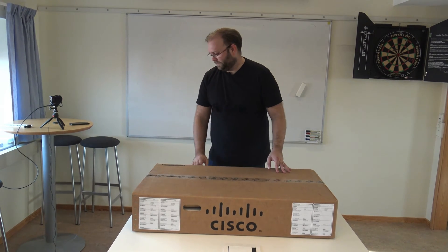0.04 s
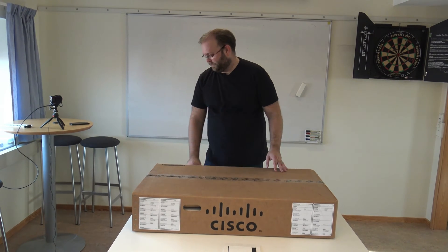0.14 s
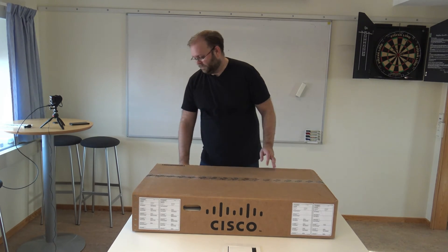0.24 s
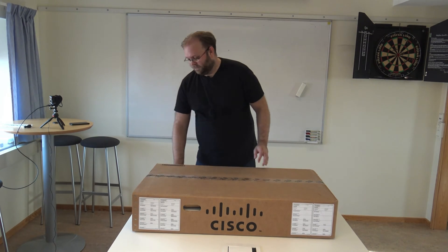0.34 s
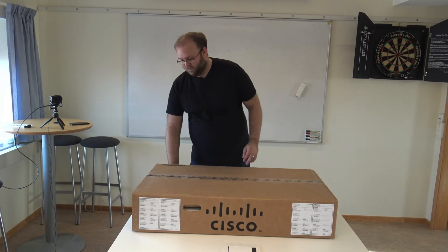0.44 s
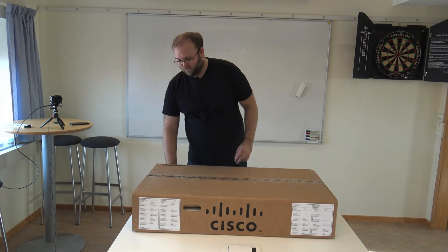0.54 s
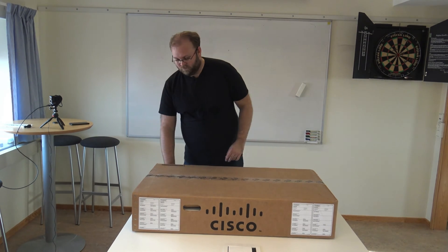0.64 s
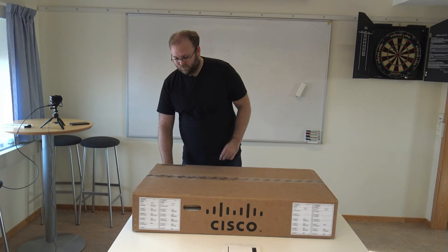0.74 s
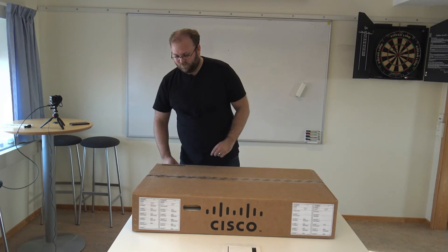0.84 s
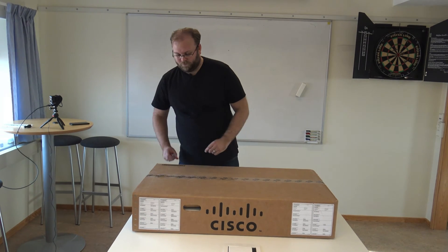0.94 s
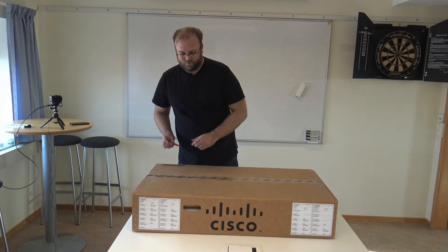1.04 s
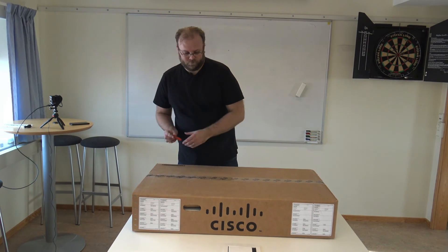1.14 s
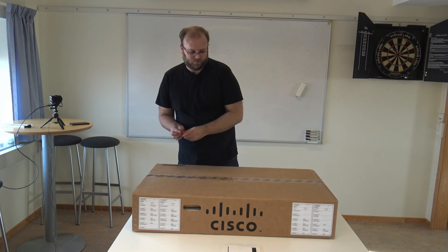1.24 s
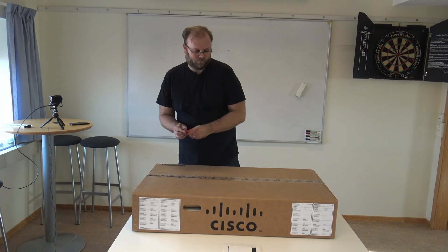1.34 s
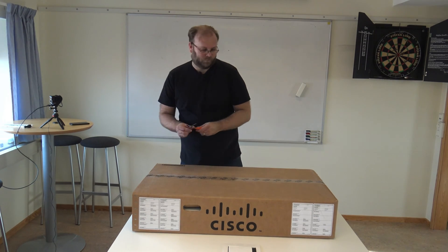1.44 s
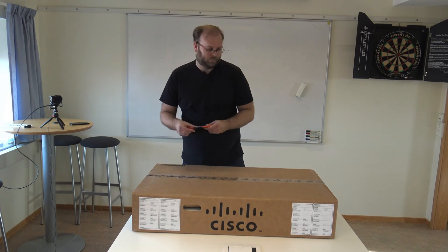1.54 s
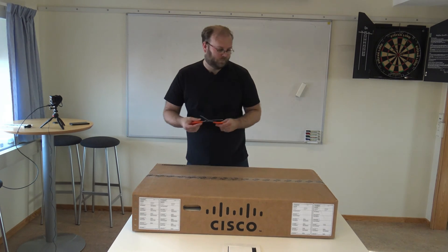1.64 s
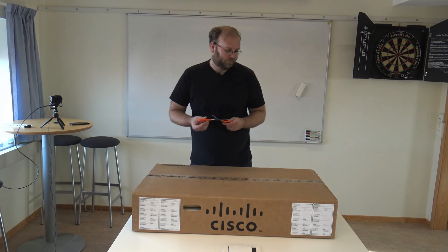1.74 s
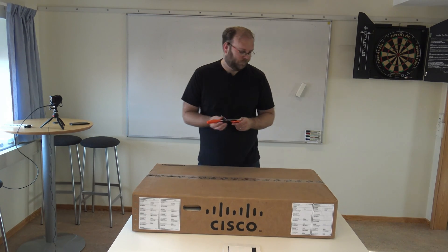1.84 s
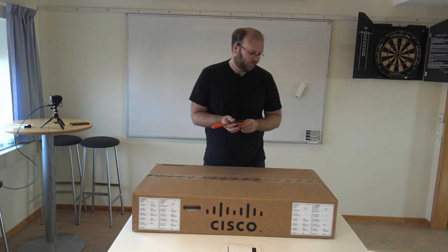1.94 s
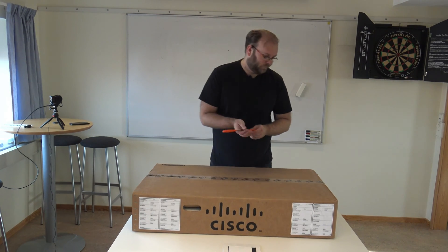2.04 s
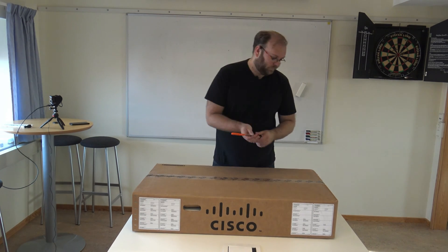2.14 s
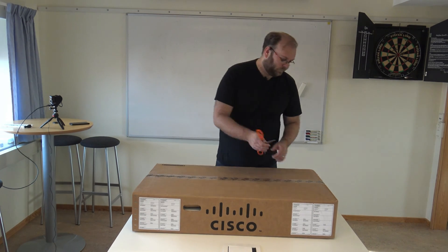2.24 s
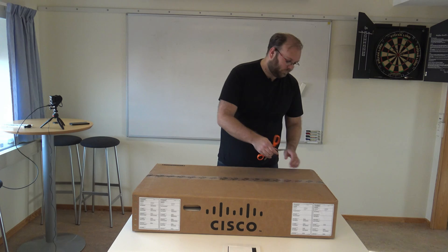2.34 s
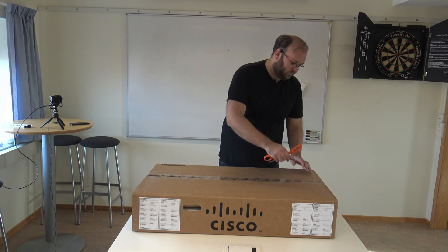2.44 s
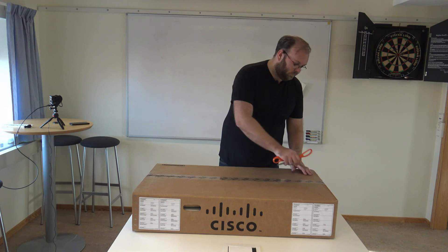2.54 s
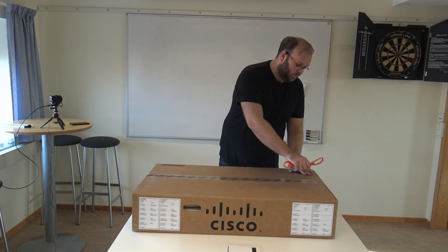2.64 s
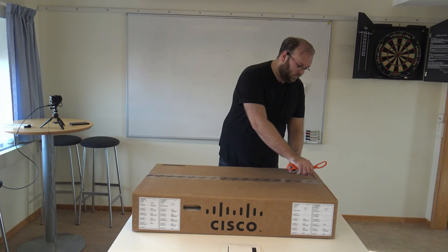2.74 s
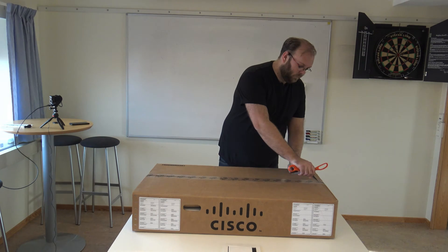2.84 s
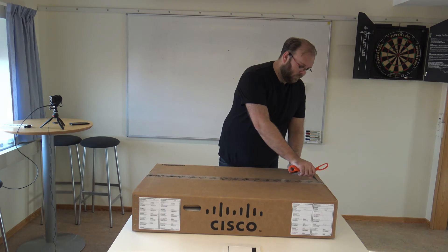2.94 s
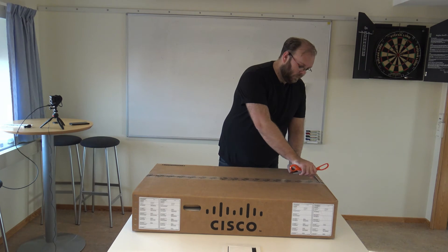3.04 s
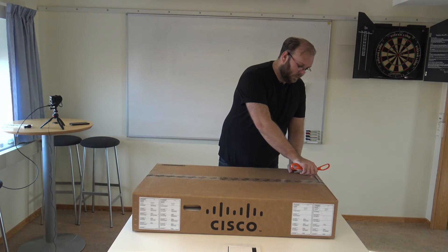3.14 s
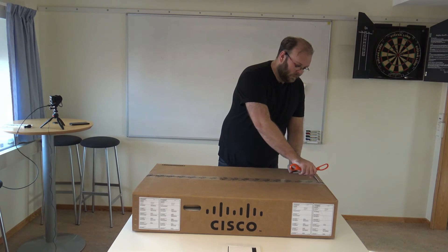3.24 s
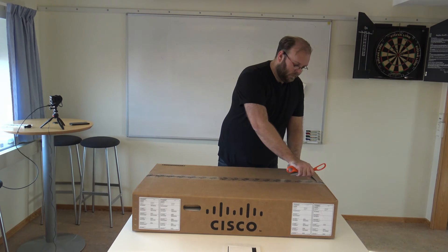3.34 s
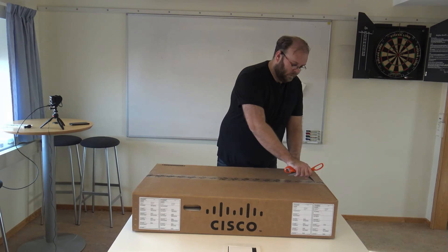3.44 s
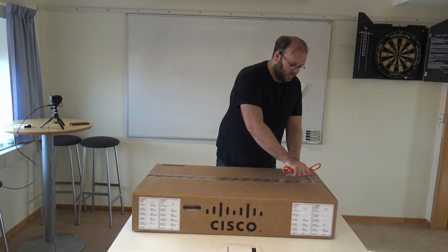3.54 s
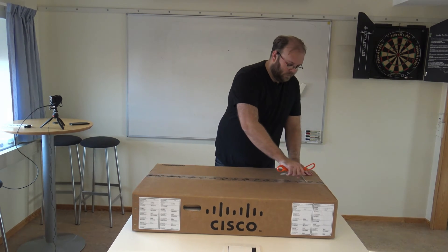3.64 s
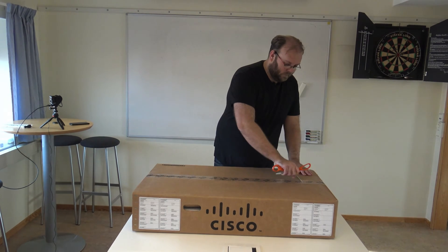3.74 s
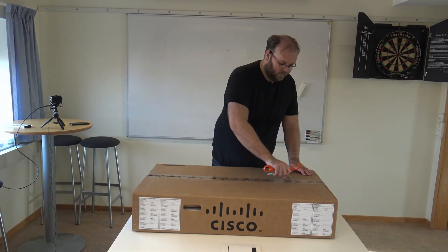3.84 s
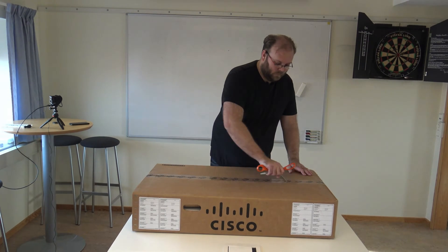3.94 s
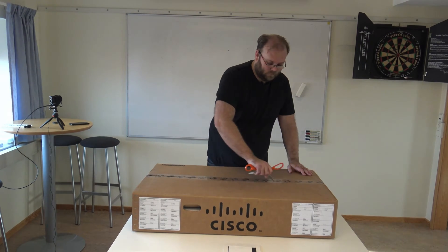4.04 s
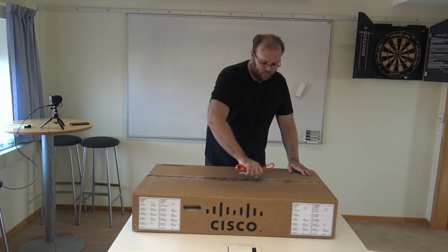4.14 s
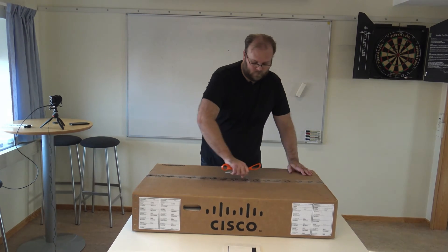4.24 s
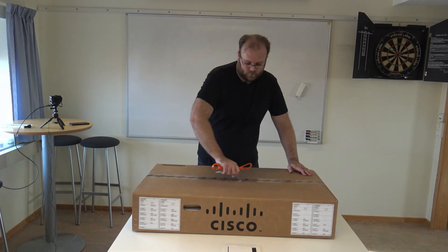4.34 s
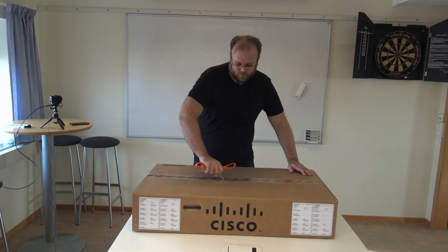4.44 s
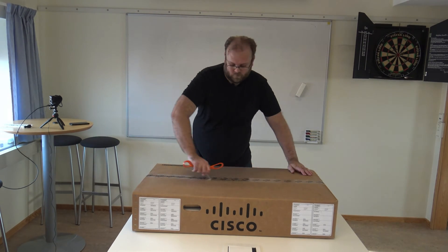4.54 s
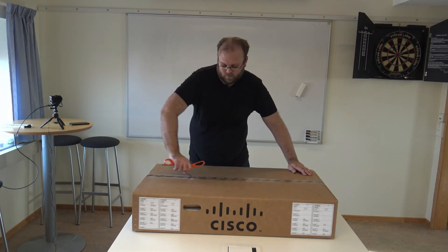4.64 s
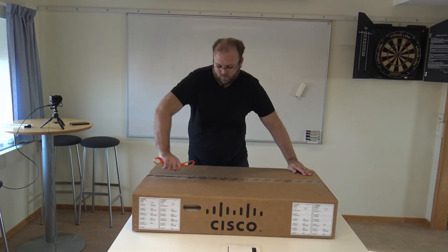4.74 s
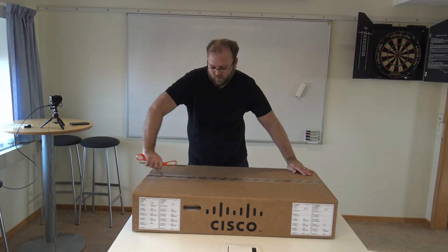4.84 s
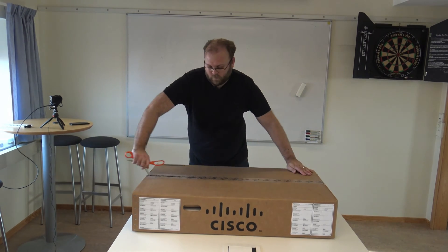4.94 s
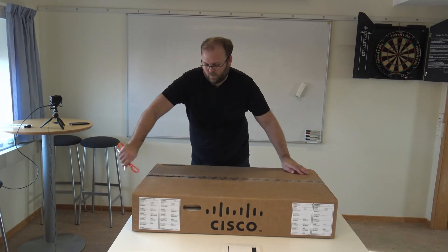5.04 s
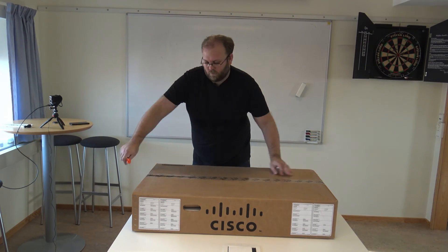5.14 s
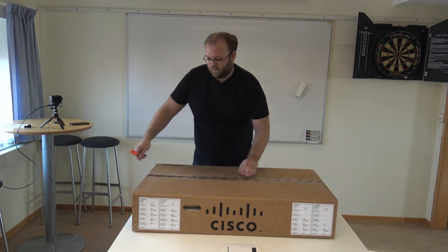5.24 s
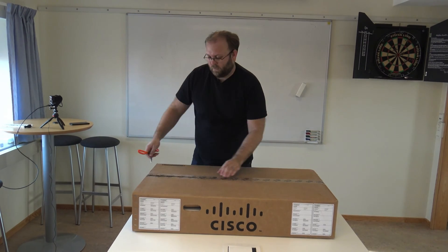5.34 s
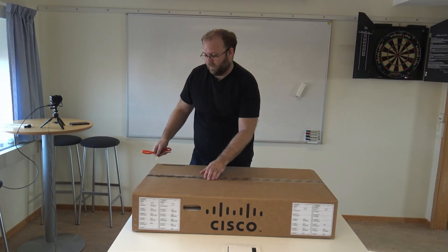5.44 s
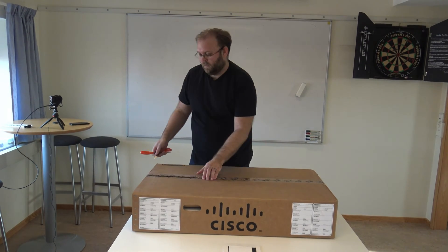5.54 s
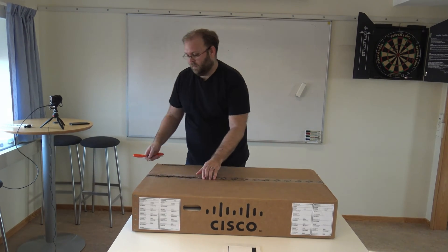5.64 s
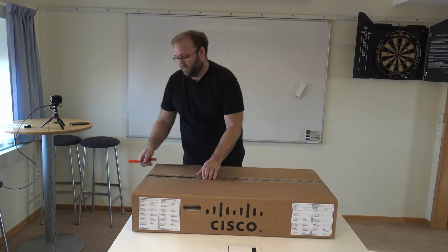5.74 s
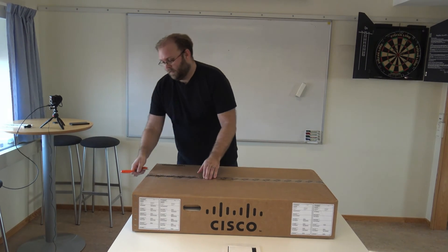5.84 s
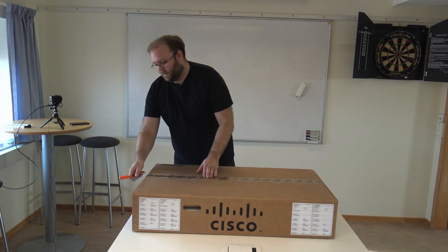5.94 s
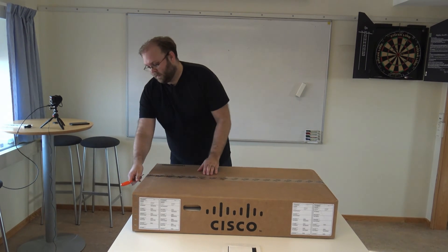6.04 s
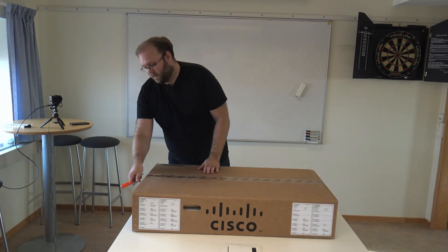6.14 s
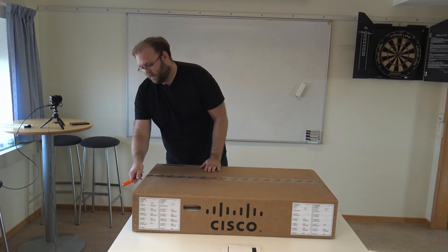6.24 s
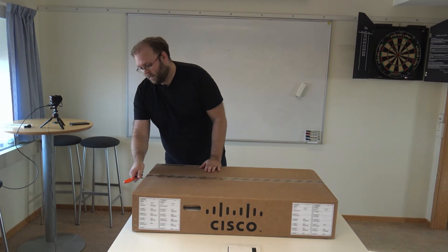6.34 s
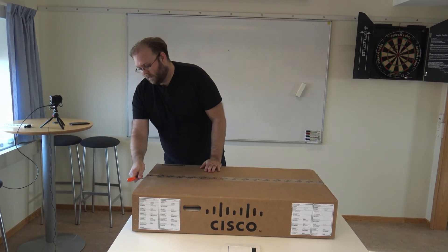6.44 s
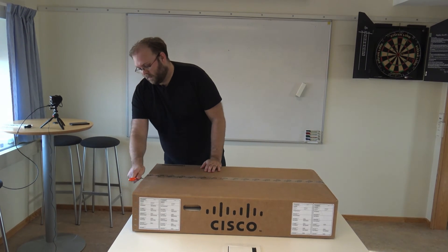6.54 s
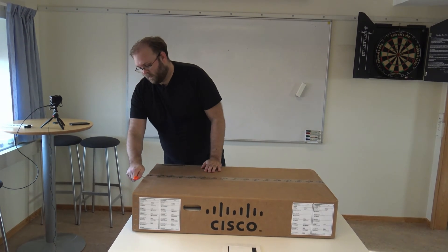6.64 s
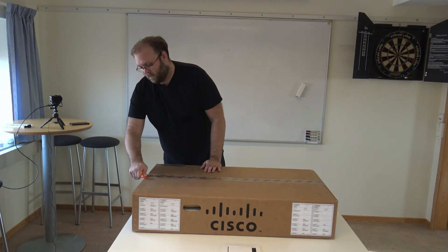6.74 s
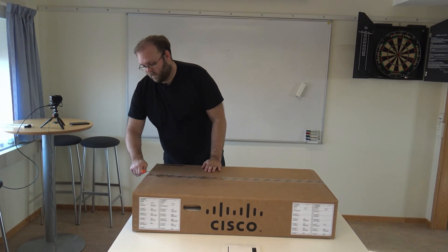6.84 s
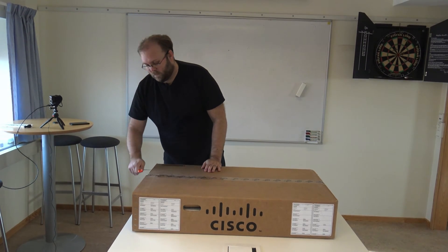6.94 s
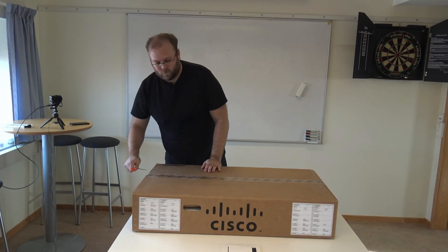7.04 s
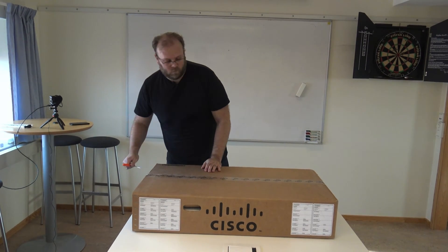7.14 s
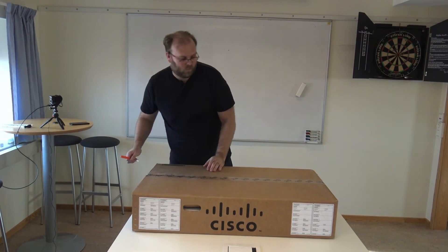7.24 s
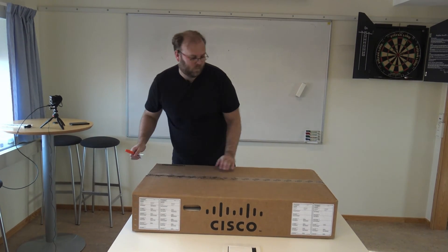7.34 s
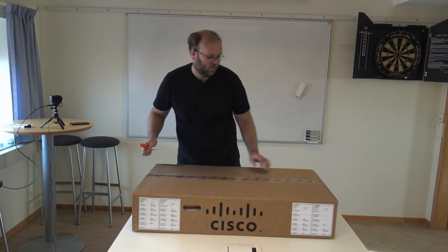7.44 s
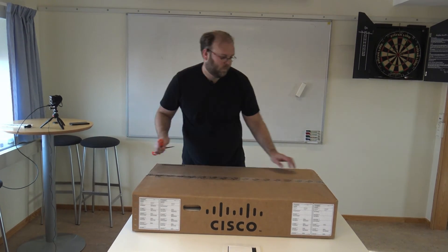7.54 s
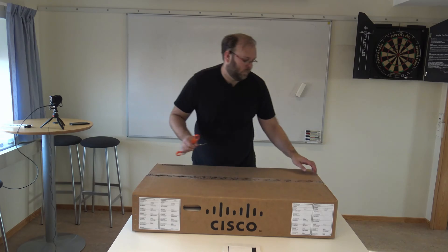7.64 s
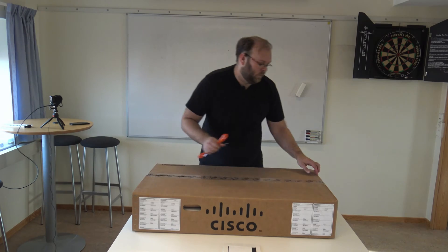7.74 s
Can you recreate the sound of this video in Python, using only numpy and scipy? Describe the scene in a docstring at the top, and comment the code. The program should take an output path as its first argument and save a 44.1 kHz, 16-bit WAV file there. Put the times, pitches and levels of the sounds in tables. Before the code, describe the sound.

In a small bare room, scissors clatter and click open with a ring, then a blade cracks and rasps through tape on a large hollow cardboard box.

```python
"""Ventilation murmurs in a small bare room and clothes rustle; scissors knock, slide, click open and ring.
The point taps a large cardboard box and bursts its packing tape with sharp cracks; then the blade drags
through a long cut: its jerks drum and rasp the board while the film crackles. Hands knock on the lid, and a
short second cut rips the tape at the end of the box. Noise bursts and stick-slip impulses excite filtered
bodies and decaying resonances; wall reflections are added, and both channels carry the same signal."""
import sys
import numpy as np
from scipy import signal
from scipy.fft import rfft, irfft
from scipy.io import wavfile

SR = 44100
rng = np.random.default_rng(int(sys.argv[2]) if len(sys.argv) > 2 else 0)


def generate_wav(sig):
    """Save sig (samples, or channels by samples) to the path in sys.argv[1] as 16-bit PCM at SR."""
    pcm = np.round(np.clip(np.atleast_2d(sig).T, -1, 1) * 32767).astype(np.int16)
    wavfile.write(sys.argv[1], SR, pcm)


N = 342657
T = np.arange(N) / SR  # scene time, s
RING_T = T[:SR * 3 // 4]  # time within one response, s

# ventilation spectrum: (frequency [Hz], level [dB])
AIR_SPECTRUM = [(20, -13), (40, 0.5), (75, -13.5), (150, -8.5), (220, -15), (560, -24), (800, -26.5),
                (1070, -23.5), (1600, -36), (3000, -35.5), (7000, -39.5), (15000, -45.5)]
AIR_DB, HEAVE_DB = -55, -43.5  # murmur; slow heave of the air near the table
# extra heave while he leans on the box: (time [s], length [s], level [dB])
LEANS = [(3.24, 0.75, -35)]
# clothes rustle as he moves: (time [s], length [s], level [dB])
RUSTLES = [(-.1, 0.49, -56.5), (.85, 0.62, -56.5), (1.5, 0.67, -65.5), (2.85, 0.59, -52),
           (5.1, 0.65, -55.5), (6.4, 0.76, -57.5), (7.35, 0.53, -54)]
# cloth spectrum: (frequency [Hz], level [dB])
CLOTH_SPECTRUM = [(400, 18), (1100, 8), (2000, 5.5), (3100, 5), (5000, 0), (7300, -1), (9000, -10),
                  (13000, -10.5), (15500, -75)]
# hands brush over cloth and tape: (time [s], length [s], level [dB])
SWISHES = [(0.94, 0.34, -70.5), (5.98, 0.065, -60), (6.05, 0.21, -59), (6.31, 0.073, -70),
           (6.39, 0.06, -65), (7.225, 0.024, -46.5)]
# fine hiss spectrum: (frequency [Hz], level [dB])
HISS_SPECTRUM = [(3000, -14), (7500, 8), (9500, 6), (12000, 7), (14000, -2), (15500, -25)]
# light scuffs of the blade at the end of the box and as it is drawn back: (time [s], length [s], level [dB])
SCUFFS = [(5.0, 0.11, -48), (5.99, 0.15, -55.5), (6.16, 0.13, -53), (6.31, 0.017, -50.5),
          (6.39, 0.057, -57.5)]
# blade on tape, spectrum: (frequency [Hz], level [dB])
TAPE_SPECTRUM = [(350, 11), (800, 5.5), (1200, 1.5), (1800, 0.5), (3000, 0), (5000, -1.5), (7500, -6.5),
                 (9500, -8.5), (12000, -12), (15500, -32)]
# the drawn-back blade scrapes the board: (time [s], pitch [Hz], level [dB])
BACK_SCRAPE_PATH = [(5.98, 1510, -66), (6.02, 1710, -59), (6.12, 2300, -61), (6.2, 1900, -60),
                    (6.29, 1800, -58), (6.33, 2420, -73), (6.37, 2000, -64), (6.44, 1700, -54),
                    (6.49, 1600, -68)]
# the drawn-back blade whispers on the film: (time [s], pitch [Hz], level [dB])
BACK_WHISPER_PATH = [(6.14, 7000, -66), (6.21, 7300, -62), (6.29, 6950, -63), (6.35, 7350, -63),
                     (6.39, 7260, -60), (6.45, 7400, -59), (6.49, 7400, -76)]
# his palm rubs the lid as it settles: (time [s], pitch [Hz], level [dB])
PALM_PATH = [(5.54, 1590, -62), (5.595, 1730, -55), (5.66, 1650, -70)]

# scissors knock on a hard surface behind the box:
# (time [s], level [dB], rattle pitch [Hz], steel tick against the knock [dB])
CLATTER_HITS = [(0.3827, -7, 2220, -12.5), (0.393, -12, 2000, -25), (0.4429, -6.5, 1120, -15.5),
                (0.4551, -22, 1240, -1), (0.4676, -13.5, 1620, -25), (0.482, -21, 1630, -16),
                (0.643, -17, 1060, -17), (0.677, -30, 1140, -22)]
BOUNCE_S, BOUNCE_DB = 0.0099, -5  # mean time to the second knock; its change of level
# hard surface spectrum: (frequency [Hz], level [dB])
SURFACE_SPECTRUM = [(88, -49), (150, -8), (364, -8), (486, 0.5), (714, -8), (1200, -4.5), (1400, -23),
                    (1670, 0), (3150, -14), (4720, -14.5), (8580, -35), (11700, -50), (15000, -48)]
# hard surface resonances: (frequency [Hz], level [dB], t60 [s])
SURFACE_RING = [(467, -2, 0.13), (1164, -2.5, 0.083), (1594, 1, 0.13), (1980, -14, .06),
                (2620, -0.5, 0.057)]
# scissors slide over that surface: (time [s], length [s], level at onset [dB])
SLIDE_STROKES = [(0.383, 0.017, -36), (0.441, 0.17, -35.5), (0.645, 0.09, -45.5)]
GRIT_DB = -20  # grit against the scrape
# shut blades ring as they slide: (frequency [Hz], level [dB], t60 [s])
SLIDING_BLADES = [(3620, -1, .03), (4780, 0, .045), (6250, 1, .06), (7150, -2, .06), (7800, -3, .045),
                  (11600, -9, .05), (13000, -13, .05)]
WAVER, WAVER_PER_S = .012, 45  # pitch share per unit of wander; wander values a second
# the surface squeaks under sliding steel: (time [s], pitch [Hz], level [dB])
SQUEAK_PATH = [(0.385, 2180, -51), (0.42, 2150, -37), (0.44, 1930, -57), (0.48, 1650, -56),
               (0.52, 1660, -40), (0.58, 1480, -76), (0.67, 1180, -44.5), (0.82, 1110, -57)]
OVERTONE, OVERTONE_DB = 1.43, -7  # second resonance of every croak or squeak: pitch ratio, level

# clicks of the scissors:
# (time [s], level [dB], contact pitch [Hz], joint against contact [dB], top of the click [Hz])
CLICKS = [(0.895, -33, 3170, -20, 5000), (1.342, -24, 2180, -20, 9000), (1.376, -25.5, 2070, -16, 11000),
          (1.389, -26, 2580, -12, 10000), (1.400, -23.5, 2410, -5, 12000), (1.507, -30, 2120, -15, 4000),
          (1.566, -23, 2330, -25, 5560), (1.648, -27.5, 2140, -2, 13000), (1.701, -31, 2100, -25, 3000),
          (1.7148, -22, 2600, 3, 14000), (1.7616, -14.5, 2870, -6, 7400), (1.8491, -27.5, 2950, -18, 4500),
          (1.8735, -33, 3830, 9, 10000), (1.9283, -18.5, 2900, -1, 8450), (1.95, -21.5, 2820, 6, 11000),
          (2.098, -18, 2930, -19, 7000), (2.112, -19, 1430, -11, 13000), (2.125, -28, 3640, 10, 13000),
          (2.2322, -5, 2630, 6, 13000), (2.2465, -14, 3700, 10, 13000), (2.5188, -29.5, 1510, -15, 9000),
          (7.208, -26.5, 1445, -16, 9000), (7.22, -21.5, 2040, -5, 12000), (7.233, -19.5, 1650, -8, 12100)]
CONTACT_OVERTONE = 2.3  # second contact resonance, as a pitch ratio
# steel blade resonances: (frequency [Hz], level [dB], t60 [s])
BLADE_RING = [(1405, -8, .18), (2530, 1, .1), (2585, -4, .4), (2930, -5, .12), (3682, -1, .28),
              (3950, -6, .3), (5426, -4, .42), (6170, -6, .2), (6500, 0, .17), (6810, 0, .15),
              (7210, -6, .36), (7290, -7, .13), (7900, -4, .16), (9900, -7, .15), (10400, -7, .14),
              (11120, -11, .2), (11280, -10, .2), (12270, -13, .18), (12990, -11, .18)]
RING_DB_PER_DB = 0.75  # blade ring follows the click level at this rate, dB per dB
# dry click of the joint, spectrum: (frequency [Hz], level [dB])
JOINT_SPECTRUM = [(700, -51), (1500, -18), (2600, -17), (4500, -36), (5600, -11), (7200, 11.5),
                  (8800, -4.5), (10600, 4), (12700, 3), (15500, 0)]
# steel on steel, spectrum: (frequency [Hz], level [dB])
STEEL_SPECTRUM = [(900, -60), (1450, -3), (1900, -2.5), (2300, 3.5), (2900, -3.5), (4200, 0), (7000, 2),
                  (9000, -4), (11500, -2.5), (15500, -14)]
# blades rub on each other: (time [s], length [s], level [dB])
SHEAR_STROKES = [(1.335, 0.079, -59), (2.088, 0.021, -50), (2.112, 0.023, -43), (2.175, 0.029, -49.5),
                 (2.23, 0.0064, -27.5), (7.215, 0.021, -61)]
# the blade sings in the seam: (time [s], length [s], level at onset [dB])
SING_STROKES = [(4.628, 0.12, -32)]
# blade held in the seam: (frequency [Hz], level [dB], t60 [s])
SEAM_BLADE = [(3180, -1, .016), (3790, -4, .012), (4030, -3, .018), (4830, -6, .012), (5310, -1, .012),
              (6120, 0, .018), (6650, -3, .014), (7470, -3, .014), (8400, -4, .008), (9050, -7, .012),
              (10600, -13, .008), (13200, -12, .006)]

# blade and hands knock on the box: (time [s], level [dB], decay time of the push [ms], panel pitch [Hz])
BOX_KNOCKS = [(2.455, -28, 2, 590), (2.543, -26, 0.4, 470), (2.564, -19, 4.3, 115), (2.7763, -8, 0.86, 327),
              (2.7811, -11, 2.1, 154), (3.2402, -9, 0.39, 472), (5.419, -16.5, 56, 78),
              (5.527, -21, 1.3, 451), (5.583, -11.5, 6.6, 120), (5.596, -17.5, 0.57, 350),
              (6.0555, -11, 0.82, 241), (6.26, -20.5, 1.6, 807), (6.539, -20, 2.5, 461),
              (6.594, -16, 0.84, 623), (6.672, -9.5, 0.29, 610), (6.7213, -1.5, 1.1, 168),
              (6.729, -14, 0.36, 320), (7.679, -17.5, 14, 108)]
# cardboard panel spectrum: (frequency [Hz], level [dB])
BOX_SPECTRUM = [(50, 2.5), (80, -31), (140, 4.5), (200, -42), (290, -6.5), (420, -10), (850, 0.5),
                (1500, -6.5), (3000, -7.5), (5000, -34), (7000, -42), (14000, -62)]
# smaller panel resonances: (frequency [Hz], level [dB], t60 [s])
PANEL_RING = [(286, 0, .13), (335, -3, .09), (436, -3, .09), (476, -1, .11), (590, -4, .07), (647, -3, .07),
              (935, -1, .08)]

# single snaps of the taut tape: (time [s], level [dB], board jolt against the snap [dB], board pitch [Hz])
TAPE_SNAPS = [(2.7762, -18.5, 11, 1130), (2.8673, -36.5, 10, 2420), (2.9475, -16, -1.5, 900),
              (2.9745, -33, -8, 1200), (3.0367, -35, 9, 1085), (3.0406, -28.5, 2, 2340),
              (3.118, -21, -2, 1090), (3.2396, 3.5, -8.5, 1120), (3.266, -13, -14, 1200),
              (3.277, -16, -14, 1200), (4.956, -17, -20, 1696), (4.963, -11, 2, 1700),
              (4.9727, -9.5, 9.5, 1580), (4.9735, -12, 14.5, 1860), (6.0567, -26.5, 0, 1500),
              (6.566, -27, -4, 1500), (6.591, -18.5, -3, 2650), (6.601, -20, -5, 1800),
              (6.663, -20, 5, 2130), (6.651, -24, 13, 1130), (6.698, -5, -13, 1520),
              (6.7056, -3.5, 9, 1240), (6.7136, -3, -9, 1400), (6.728, -21, 12, 1380),
              (6.744, -12, -7, 1220), (6.7569, -17.5, 12.5, 1700)]
# quick runs of snaps as tape rips: (time [s], length [s], level [dB], board jolt against the snaps [dB])
TAPE_RIPS = [(6.67, .019, -9.5, 2), (6.712, .009, -6.5, -20)]
RIP_GAP_S, RIP_HZ = .0035, 2000  # mean time between snaps; middle pitch of the board
# tape film spectrum: (frequency [Hz], level [dB])
FILM_SPECTRUM = [(300, -1.5), (1100, -2), (2200, -7), (3400, -1), (5100, -4), (7400, 2), (9500, -6.5),
                 (12000, -8.5), (15500, -24)]
# jolted board spectrum: (frequency [Hz], level [dB])
BOARD_SPECTRUM = [(120, -3), (300, 3.5), (550, -6), (1100, -5.5), (1650, 0.5), (2200, -1.5), (3200, -5),
                  (6000, -19)]
# a snap as it reaches the walls, spectrum: (frequency [Hz], level [dB])
SPRAY_SPECTRUM = [(300, 10), (1100, -1.5), (2200, -4), (4000, -2), (7200, -0.5), (9500, -8.5), (12000, -8),
                  (15500, -26)]

# long cut along the box: (time [s], effort of the stroke [dB], bite into the board [dB])
LONG_STROKE = [(3.46, -35, 5), (3.56, -23, 1.5), (3.75, -16, 2), (3.96, -10.5, 0.5), (4.12, -5.5, 2),
               (4.419, -3, 0.5), (4.52, 1, 0), (4.605, -0.5, 0.5), (4.635, 0.5, -9), (4.771, -2.5, -2.5),
               (4.87, 0, -2.5), (4.97, -2, -2.5)]
# short cut at its end: (time [s], effort of the stroke [dB], bite into the board [dB])
END_STROKE = [(6.56, -30.5, 5), (6.6, -15.5, -2), (6.645, -14, 0.5), (6.71, 4, -11.5), (6.745, -3.5, -8),
              (6.8, -0.5, -6), (6.91, -7, -3), (6.97, -11.5, -41)]
# cut layers following the hand: (level [dB], per effort [dB per dB], per bite [dB per dB])
BOOM_FOLLOW = (-35.5, 0.7, 1.25)
DRUM_FOLLOW = (-27, 1.034, 1)
RASP_FOLLOW = (-38, 0.54, 0.24)
FILM_FOLLOW = (-37.5, 0.81, 0)
FIBRE_FOLLOW = (-39, 0.8, 0.6)
# low boom, drumming box, rasping board and crackling film, spectra: (frequency [Hz], level [dB])
BOOM_SPECTRUM = [(45, -21), (62, 1), (80, 0.5), (120, 1), (160, 5), (215, -9), (400, -36)]
DRUM_SPECTRUM = [(130, -19), (210, -6.5), (290, 5), (380, 0), (470, 0.5), (620, -4.5), (800, -4),
                 (950, -6.5), (1300, -12.5), (2500, -39)]
RASP_SPECTRUM = [(600, -17.5), (1200, -0.5), (1700, 5), (2400, -2), (3200, -0.5), (5000, -9.5)]
CRACKLE_SPECTRUM = [(1800, -16), (3200, -1), (4800, -2), (6800, 0), (8200, -2), (9500, -6.5), (11500, -6),
                    (13500, -11), (15500, -21)]
# lid resonances: (frequency [Hz], level [dB], t60 [s])
LID_RING = [(77, -9, .2), (98, -7, .15), (118, -2, .22), (148, 0, .3), (165, -5, .18)]
# flutes of the board: bumps a second at 0 dB effort, growth of that rate [dB per dB], unevenness, share of drag
FLUTE_HZ, FLUTE_GROWTH, FLUTE_JITTER, FLUTE_SHARE = 159.4, .6, .13, 0.66
FIBRES_PER_S, FIBRE_SPREAD_DB = 130, 5  # single fibres of the board part under the blade
# the lid's pitch shifts as the blade travels: (time [s], pitch [Hz], level [dB])
LID_TRAVEL = [(3.8, 85, -48), (3.93, 89, -37), (4.06, 95, -35.5), (4.19, 131, -29.5), (4.33, 137, -29),
              (4.44, 150, -32), (4.5, 156, -37), (4.6, 151, -27), (4.69, 150, -46)]
# the flap's pitch shifts likewise: (time [s], pitch [Hz], level [dB])
FLAP_TRAVEL = [(3.49, 424, -57), (3.58, 360, -38), (3.66, 390, -51), (3.74, 400, -48), (3.87, 387, -37),
               (3.97, 293, -34), (4.1, 350, -37), (4.25, 368, -33), (4.43, 475, -33), (4.51, 300, -32.5),
               (4.68, 274, -43.5), (4.8, 283, -30), (4.88, 300, -48)]
# a flap edge croaks under the blade, long cut then end cut: (time [s], pitch [Hz], level [dB])
LONG_CROAK_PATH = [(4.03, 1150, -55), (4.12, 1520, -42), (4.25, 1600, -48), (4.45, 1670, -40),
                   (4.52, 1600, -33.5), (4.6, 1700, -48), (4.63, 1720, -60)]
END_CROAK_PATH = [(6.752, 1650, -48), (6.758, 1720, -36), (6.776, 1850, -34.5), (6.784, 2160, -31.5),
                  (6.81, 1740, -25), (6.828, 1720, -42), (6.85, 1630, -34), (6.875, 1565, -56)]
# the blade snags on fibres: (time [s], level before SNAG_DB is added [dB], panel pitch [Hz])
FIBRE_SNAGS = [(3.511, -25.5, 422), (3.738, -18.5, 390), (3.821, -15.5, 444), (3.966, -16, 310),
               (4.015, -17, 697), (4.081, -10, 338), (4.183, -18, 460), (4.249, -9.5, 345),
               (4.31, -15, 402), (4.385, -19, 463), (4.541, -16, 298), (4.591, -11, 392), (4.601, -9, 657)]
SNAG_DB, CRUNCH_DB = 10, -13  # boost of every snag; torn fibres against the thump


def undb(db):
    """Decibels to gain."""
    return 10 ** (np.asarray(db) / 20)


def unit(response):
    """Scale a response to unit energy."""
    return response / np.sqrt(np.sum(response ** 2))


def steady(x):
    """Scale a sound to a standard deviation of 1."""
    return x / np.std(x)


def through(x, response):
    """Play a sound through a response."""
    return signal.fftconvolve(x, response)[:len(x)]


def add(track, s, sound):
    """Mix a sound into a track at a time."""
    start = int(s * SR)
    track[..., start:start + sound.shape[-1]] += sound[..., :N - start]


def band(x, lo_hz, hi_hz):
    """Band-pass."""
    return signal.sosfilt(signal.butter(2, [lo_hz, hi_hz], "band", fs=SR, output="sos"), x)


def fade(t60):
    """Exponential decay by 60 dB in t60 seconds."""
    return np.exp(-np.log(1000) * RING_T / t60)


def colour(points):
    """Causal minimum-phase response of a heavily damped body with this spectrum."""
    hz, db = np.transpose(points)
    size = len(RING_T)
    octaves = np.log2(np.maximum(np.fft.rfftfreq(size, 1 / SR), 1))
    outside = np.abs(octaves - np.clip(octaves, np.log2(hz[0]), np.log2(hz[-1])))
    # beyond the end points the spectrum falls 10 dB an octave
    spectrum_db = np.interp(octaves, np.log2(hz), db) - 10 * outside
    cepstrum = irfft(np.log(undb(spectrum_db)), size)
    # folding the cepstrum makes the phase minimal
    cepstrum[1:size // 2] *= 2
    cepstrum[size // 2:] = 0
    return unit(irfft(np.exp(rfft(cepstrum)), size))


def ping(hz, t60):
    """A short resonance at the point of contact."""
    return unit(np.sin(2 * np.pi * hz * RING_T) * fade(t60))


def ring(modes, scatter_db=0):
    """Decaying modes; each contact point weights them differently when scatter is given."""
    out = np.zeros(len(RING_T))
    for hz, db, t60 in modes:
        gain = rng.choice([-1, 1]) * undb(db + scatter_db * rng.standard_normal())
        out += gain * fade(t60) * np.sin(2 * np.pi * hz * RING_T)
    return unit(out)


def burst(t60):
    """A short spray of micro-contacts, as decaying noise."""
    return unit(rng.standard_normal(len(RING_T)) * fade(t60))


def slips(per_s, spread_db):
    """Stick-slip: randomly timed releases of either sign and unequal size."""
    size = undb(spread_db * np.minimum(rng.exponential(size=N), np.pi))
    return steady((rng.random(N) < per_s / SR) * size * rng.choice([-1, 1], N))


def strokes(rows, attack_s, release_s, slope_db_per_s=0):
    """Gain over time of gestures: attack, sloping hold, release."""
    out = np.zeros(N)
    for s, length, db in rows:
        age = T - s
        attack = np.clip(age / attack_s, 0, 1)
        hold = undb(db + slope_db_per_s * np.clip(age, 0, length))
        out += attack * hold * np.exp(-np.maximum(age - length, 0) / release_s)
    return out


def wander(per_s):
    """Slow chance: glides between random values, so many a second."""
    values = rng.standard_normal(N // 100)
    return 1.2 * np.interp(T * per_s, np.arange(len(values)), values)


def glide(x, hz, width_hz):
    """A resonance whose centre moves: a one-pole filter in a frame turning at its pitch."""
    turn = np.exp(2j * np.pi * np.cumsum(hz) / SR)
    pole = np.exp(-np.pi * width_hz / SR)
    return steady(np.imag(turn * signal.lfilter([1], [1, -pole], x / turn)))


def follow(path):
    """Pitch and gain over time along a path; the gain is zero outside it."""
    s, hz, db = np.transpose(path)
    gain = undb(np.interp(T, s, db)) * (T >= s[0]) * (T <= s[-1])
    return np.interp(T, s, hz), gain


def croak(path, slips_per_s, width_hz):
    """Stick-slip jerks ring two resonances that slide as the contact moves."""
    pitch, gain = follow(path)
    jerks = band(slips(slips_per_s, spread_db=-1.5), lo_hz=.6 * pitch.min(), hi_hz=1.95 * pitch.max())
    voice = glide(jerks, pitch, width_hz)
    voice += undb(OVERTONE_DB) * glide(jerks, OVERTONE * pitch, 2 * width_hz)
    return gain * voice


def wavering(x, modes, shift_db):
    """Steel under a sliding contact: each mode wavers in pitch, and swells and fades on its own."""
    out = np.zeros(N)
    for hz, db, t60 in modes:
        gain = undb(db + shift_db * np.tanh(wander(WAVER_PER_S / 2)))
        pitch = hz * (1 + WAVER * wander(WAVER_PER_S))
        out += gain * glide(x, pitch, width_hz=np.log(1000) / (np.pi * t60))
    return steady(out)


def background():
    """Ventilation murmur, as coloured noise, over a slow, barely audible heave of the air."""
    air = steady(through(rng.standard_normal(N), colour(AIR_SPECTRUM)))
    heave = steady(band(rng.standard_normal(N), lo_hz=3.64, hi_hz=9.15))
    heave_gain = undb(HEAVE_DB) + strokes(LEANS, attack_s=0.043, release_s=0.11)
    return undb(AIR_DB) * air + heave_gain * heave


def rubbing():
    """Light friction under an uneven hand: steel over tape is grainy, cloth is fine and soft."""
    cloth = steady(through(slips(per_s=6000, spread_db=3.5), colour(CLOTH_SPECTRUM)))
    hiss = steady(through(slips(per_s=4300, spread_db=2.0), colour(HISS_SPECTRUM)))
    scuff = steady(through(slips(per_s=2500, spread_db=-0.5), colour(TAPE_SPECTRUM)))
    rubs = strokes(RUSTLES, attack_s=0.23, release_s=0.11) * cloth
    rubs += strokes(SWISHES, attack_s=0.014, release_s=0.034) * hiss
    rubs += strokes(SCUFFS, attack_s=0.018, release_s=0.085) * scuff
    scrapes = croak(BACK_SCRAPE_PATH, slips_per_s=750, width_hz=390)
    scrapes += croak(BACK_WHISPER_PATH, slips_per_s=1600, width_hz=700)
    scrapes += croak(PALM_PATH, slips_per_s=700, width_hz=340)
    pressure = undb(1.3 * wander(per_s=16))
    return scrapes + pressure * rubs


def pickup():
    """The scissors bounce on a hard surface and scrape off it; grit sets the blades ringing."""
    body = unit(colour(SURFACE_SPECTRUM) + undb(-5.5) * ring(SURFACE_RING))
    scrape = steady(through(slips(per_s=700, spread_db=3.5), body))
    gritty_steel = colour(STEEL_SPECTRUM) + undb(-6) * ring(BLADE_RING)
    grit = steady(through(slips(per_s=1000, spread_db=6), gritty_steel))
    whine = wavering(slips(per_s=690, spread_db=1.5), SLIDING_BLADES, shift_db=9.0)
    out = strokes(SLIDE_STROKES, attack_s=0.002, release_s=0.045, slope_db_per_s=-48) * scrape
    grit_gain = strokes(SLIDE_STROKES, attack_s=0.0018, release_s=0.0068, slope_db_per_s=-4)
    out += undb(GRIT_DB) * grit_gain * grit
    whine_gain = strokes(SLIDE_STROKES, attack_s=0.0036, release_s=0.022, slope_db_per_s=-12)
    out += undb(-15.0) * whine_gain * whine
    for s, db, hz, tick_db in CLATTER_HITS:
        for bounce in range(2):
            tick = unit(through(burst(t60=0.027), colour(HISS_SPECTRUM)))
            knock = through(burst(t60=0.036), body) + undb(1.0) * ping(hz, t60=0.011)
            add(out, s, undb(db + bounce * BOUNCE_DB) * (knock + undb(tick_db) * tick))
            s += BOUNCE_S * rng.uniform(.6, 1.4)
    return out


def scissors():
    """The joint clicks and the blades ring; rubbing steel keeps them ringing."""
    out = np.zeros(N)
    for s, db, hz, joint_db, top_hz in CLICKS:
        tap = unit(through(burst(t60=.012), ping(hz, t60=.006)))
        rub = through(burst(t60=.015), colour(STEEL_SPECTRUM))
        tone = ping(hz, t60=.03) + ping(CONTACT_OVERTONE * hz, t60=.06)
        contact = unit(tap + .5 * rub + .35 * tone)
        joint = unit(through(burst(t60=0.012), colour(JOINT_SPECTRUM)))
        click = unit(band(contact + undb(joint_db) * joint, lo_hz=1560, hi_hz=top_hz))
        # added to the click's own level, so harder clicks ring proportionally more
        blades = undb(RING_DB_PER_DB * db) * ring(BLADE_RING, scatter_db=1.5)
        add(out, s, undb(db) * (click + blades))
    steel = unit(colour(STEEL_SPECTRUM) + undb(-2.5) * ring(BLADE_RING))
    shear = steady(through(slips(per_s=2200, spread_db=2.0), steel))
    out += strokes(SHEAR_STROKES, attack_s=0.0065, release_s=0.0081) * shear
    chatter = slips(per_s=900, spread_db=-1.0)
    rattle = steady(through(chatter, colour(STEEL_SPECTRUM) + colour(JOINT_SPECTRUM)))
    song = steady(wavering(chatter, SEAM_BLADE, shift_db=3.0) + 0.28 * rattle)
    return out + strokes(SING_STROKES, attack_s=0.0064, release_s=0.022, slope_db_per_s=17) * song


def knocks():
    """Blows on the hollow box; a longer push gives a duller thud, and the struck panel adds its pitch."""
    out = np.zeros(N)
    for s, db, push_ms, hz in BOX_KNOCKS:
        push = RING_T * fade(push_ms / 1000)
        body = colour(BOX_SPECTRUM) + undb(6.0) * through(burst(t60=0.022), colour(BOX_SPECTRUM))
        body += undb(1.0) * ring(PANEL_RING, scatter_db=3.5)
        add(out, s, undb(db) * (unit(through(body, push)) + undb(1) * ping(hz, t60=0.052)))
    return out


def bend(response, lag_ms):
    """Bending waves in a sheet: the treble arrives first, 1 kHz comes lag_ms later."""
    khz = np.fft.rfftfreq(len(response), 1 / SR) / 1000
    return irfft(rfft(response) * np.exp(-2j * np.pi * 2 * lag_ms * np.sqrt(khz)), len(response))


def snap(board_db, hz):
    """The taut film bursts with a sharp crack and jolts the board: (direct sound, sound towards the walls)."""
    film = bend(colour(FILM_SPECTRUM), lag_ms=0.861 * rng.uniform(0.53, 1.467))
    fibres = through(burst(t60=0.015), colour(FILM_SPECTRUM))
    board = unit(ping(hz, t60=0.019) + 0.89 * through(burst(t60=0.023), colour(BOARD_SPECTRUM)))
    direct = film + undb(-6.0) * fibres + undb(board_db) * board
    to_walls = colour(SPRAY_SPECTRUM) + undb(board_db - 4) * colour(BOARD_SPECTRUM)
    return np.array([direct, to_walls])


def snaps():
    """Single snaps where the point pricks the tape, unevenly timed runs of them where it rips."""
    out = np.zeros((2, N))
    for s, db, board_db, hz in TAPE_SNAPS:
        add(out, s, undb(db) * snap(board_db, hz))
    for start, length, db, board_db in TAPE_RIPS:
        for s in np.arange(start, start + length, RIP_GAP_S):
            late, pitch = rng.standard_normal(2)
            add(out, s + RIP_GAP_S * late / 4, undb(db) * snap(board_db, RIP_HZ * np.exp(.1 * pitch)))
    return out


def swell(stroke, law):
    """Gain over time of one layer of a cut, from effort and bite; silent outside the cut."""
    s, effort, bite = np.transpose(stroke)
    db, per_effort, per_bite = law
    gain = undb(np.interp(T, s, db + per_effort * effort + per_bite * bite))
    return gain * (T >= s[0]) * (T <= s[-1])


def flutes(stroke):
    """One bump for each flute under the blade; a stronger stroke crosses them faster."""
    s, effort, _ = np.transpose(stroke)
    unevenness = steady(band(rng.standard_normal(N), lo_hz=8.04, hi_hz=60.3))
    speed = undb(FLUTE_GROWTH * np.interp(T, s, effort))
    hz = FLUTE_HZ * speed * np.exp(FLUTE_JITTER * unevenness)
    bumps = np.diff(np.floor(np.cumsum(hz) / SR), prepend=0)
    return (bumps - hz / SR) * np.sqrt(SR / hz)  # no offset, even power at any rate


def travelling(x, modes, shift_db):
    """A moving contact crosses the nodes of each mode, so the modes swell and fade independently."""
    out = np.zeros(N)
    for hz, db, t60 in modes:
        place = steady(band(rng.standard_normal(N), lo_hz=2, hi_hz=9))
        out += undb(db + shift_db * np.tanh(place)) * through(x, ping(hz, t60))
    return steady(out)


def cut(stroke, catches_per_s, tears_per_s, spread_db):
    """The blade bumps over flutes, catches and frees itself; each jerk drums the box and tears fibres and film."""
    catches = slips(catches_per_s, spread_db=0.5)
    jerk = steady(through(np.abs(catches), fade(t60=0.17)))
    tearing = np.sqrt(np.abs(jerk) + .5)
    drag = steady(catches + 0.97 * slips(per_s=1400, spread_db=2.5))
    bumps = FLUTE_SHARE * flutes(stroke)
    boom = steady(through(bumps + 0.75 * drag, colour(BOOM_SPECTRUM)))
    boom += 0.29 * travelling(drag, LID_RING, shift_db=4)
    drum = steady(through(0.59 * bumps + drag, colour(DRUM_SPECTRUM)))
    drum += 0.43 * travelling(drag, PANEL_RING, shift_db=9)
    board_tears = steady(tearing * slips(tears_per_s, spread_db))
    rasp = steady(through(.5 * catches + board_tears, colour(RASP_SPECTRUM)))
    film = steady(through(tearing * slips(tears_per_s, spread_db), colour(CRACKLE_SPECTRUM)))
    fibre_body = colour(BOARD_SPECTRUM) + .5 * colour(CRACKLE_SPECTRUM)
    fibres = steady(through(tearing * slips(FIBRES_PER_S, FIBRE_SPREAD_DB), fibre_body))
    out = swell(stroke, BOOM_FOLLOW) * boom + swell(stroke, DRUM_FOLLOW) * drum
    out += swell(stroke, RASP_FOLLOW) * rasp + swell(stroke, FILM_FOLLOW) * film
    return out + swell(stroke, FIBRE_FOLLOW) * fibres


def panel(path, jerks_per_s, width_hz):
    """Jerks of the blade ring a cardboard panel whose pitch shifts with the place of contact."""
    pitch, gain = follow(path)
    jerks = band(slips(jerks_per_s, spread_db=1.5), lo_hz=0.59 * pitch.min(), hi_hz=1.4 * pitch.max())
    return gain * glide(jerks, pitch, width_hz)


def jolts():
    """The blade snags and breaks free: a crunch and a thump of the panel together."""
    out = np.zeros(N)
    for s, db, hz in FIBRE_SNAGS:
        fibre_body = colour(BOARD_SPECTRUM) + .5 * colour(FILM_SPECTRUM)
        crunch = unit(through(burst(t60=0.027), fibre_body))
        thump = unit(colour(DRUM_SPECTRUM) + ping(hz, t60=0.083))
        add(out, s, undb(db + SNAG_DB) * (thump + undb(CRUNCH_DB) * crunch))
    return out


def room(t60_low, t60_mid, t60_high):
    """Reflections off bare walls: they build up within milliseconds, and each band dies at its own rate."""
    noise = rng.standard_normal(len(RING_T))
    tail = band(noise, 70, 700) * fade(t60_low)
    tail -= band(noise, 700, 5000) * fade(t60_mid)  # opposite sign to its neighbours
    tail += band(noise, 5000, 16000) * fade(t60_high)
    return unit(tail * np.clip((RING_T - .003) / 0.01, 0, 1))


def scene():
    """Mix direct sounds with wall reflections; those behind the box send most to the walls."""
    walls = room(t60_low=0.83, t60_mid=0.48, t60_high=0.52)
    quiet = background() + rubbing()
    hidden = pickup() + croak(SQUEAK_PATH, slips_per_s=550, width_hz=290)
    steel = scissors()
    blows = knocks() + jolts()
    cracks, spray = snaps()
    cuts = cut(LONG_STROKE, catches_per_s=130, tears_per_s=2600, spread_db=-3.0)
    cuts += croak(LONG_CROAK_PATH, slips_per_s=250, width_hz=110)
    cuts += cut(END_STROKE, catches_per_s=100, tears_per_s=1600, spread_db=-1.0)
    cuts += croak(END_CROAK_PATH, slips_per_s=350, width_hz=170)
    cuts += panel(LID_TRAVEL, jerks_per_s=300, width_hz=22)
    cuts += panel(FLAP_TRAVEL, jerks_per_s=300, width_hz=67)
    send = undb(-4.5) * hidden + undb(-11.0) * steel + undb(-8.0) * blows
    send += undb(-11.0) * cuts + undb(-10) * spray
    mono = hidden + steel + blows + cracks + cuts + through(send, walls) + quiet
    return np.array([mono, mono])


def record(dry):
    """Round the sharpest peaks by soft saturation and cut everything above 15.8 kHz."""
    rounded = .75 * np.tanh(dry / .75)
    return signal.sosfilt(signal.ellip(8, .2, 70, 15800, fs=SR, output="sos"), rounded)


dry = scene()
out = record(dry)
generate_wav(out)
```